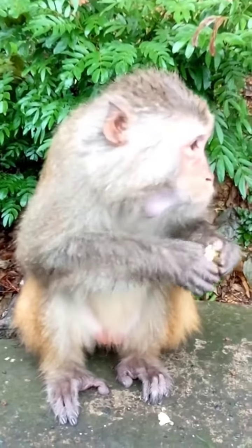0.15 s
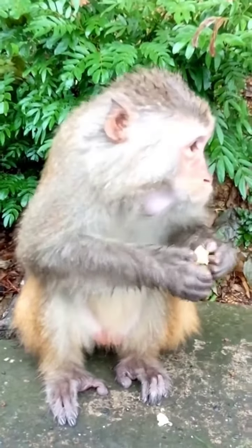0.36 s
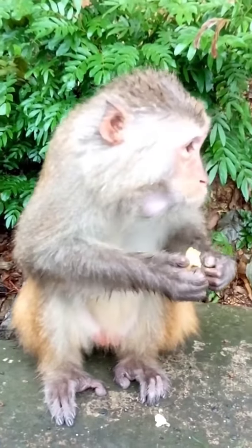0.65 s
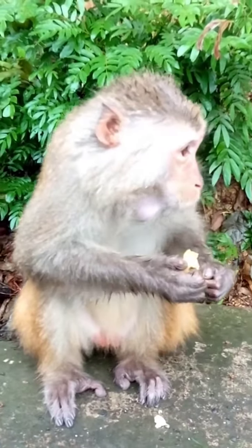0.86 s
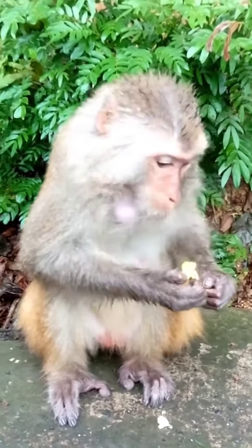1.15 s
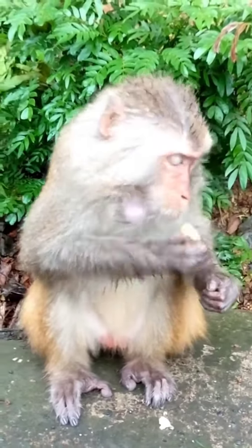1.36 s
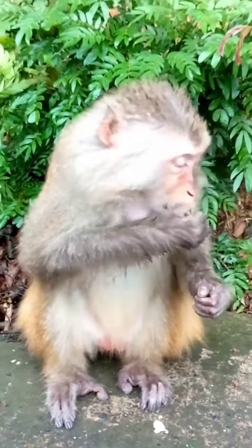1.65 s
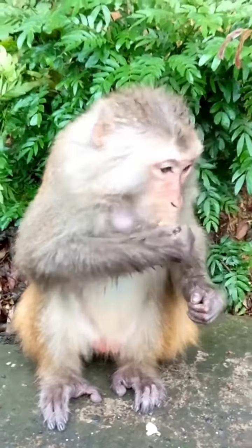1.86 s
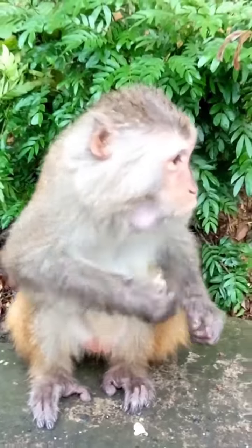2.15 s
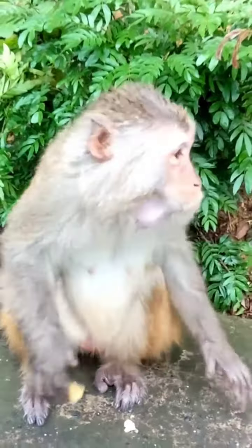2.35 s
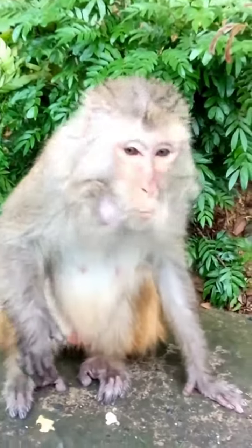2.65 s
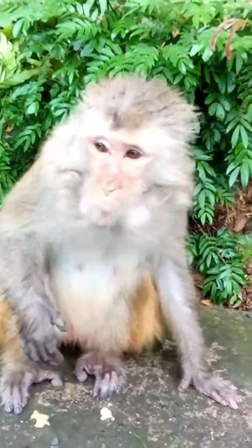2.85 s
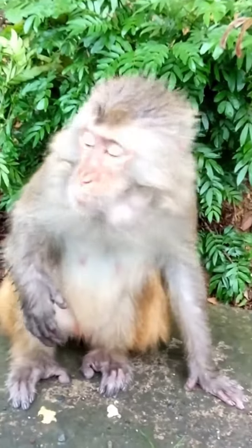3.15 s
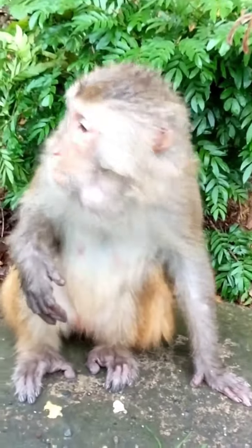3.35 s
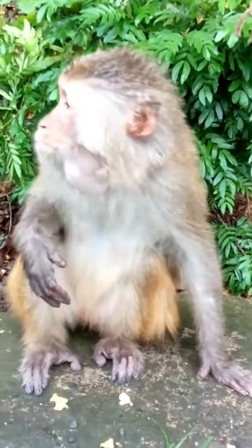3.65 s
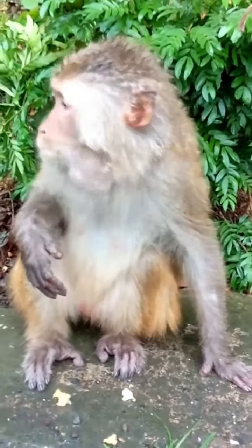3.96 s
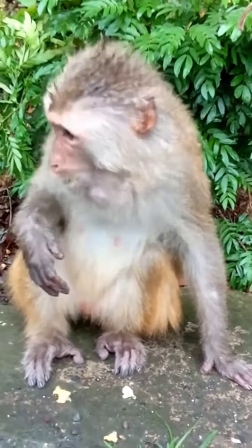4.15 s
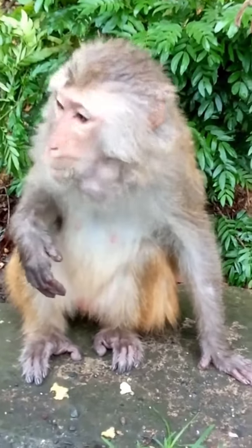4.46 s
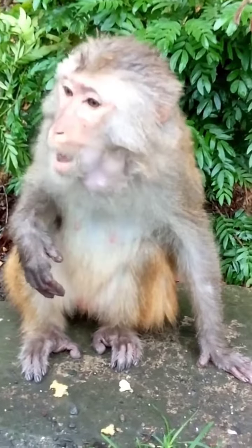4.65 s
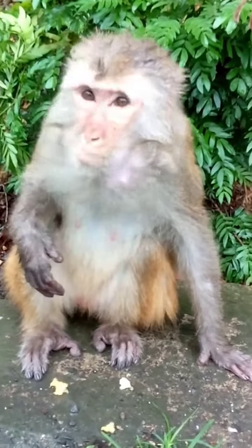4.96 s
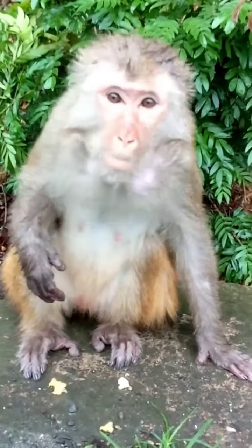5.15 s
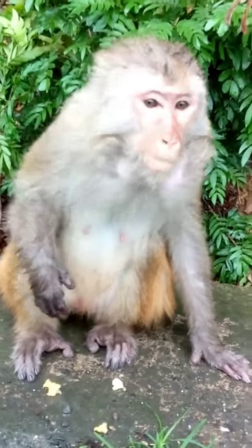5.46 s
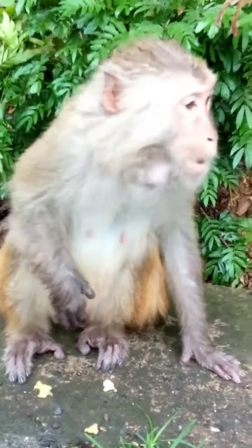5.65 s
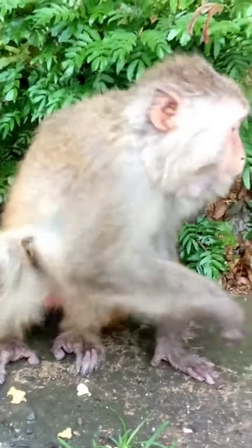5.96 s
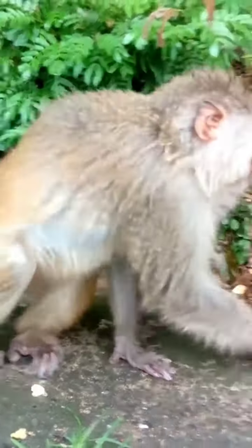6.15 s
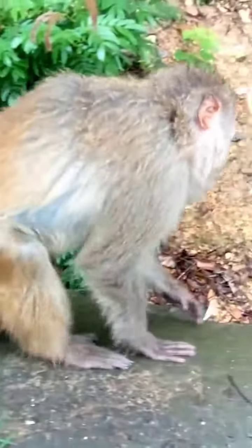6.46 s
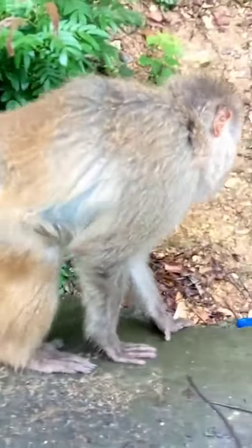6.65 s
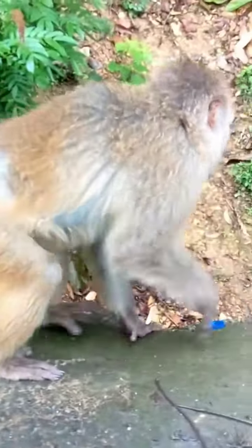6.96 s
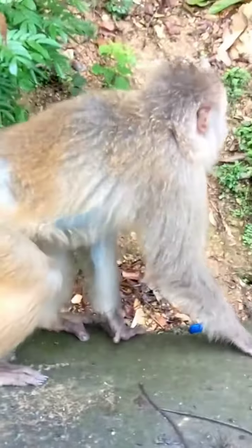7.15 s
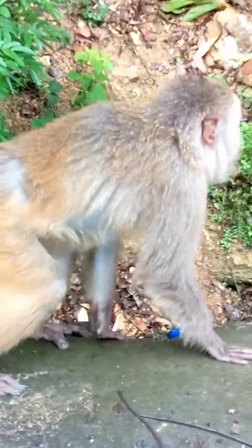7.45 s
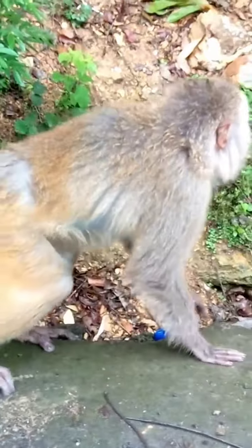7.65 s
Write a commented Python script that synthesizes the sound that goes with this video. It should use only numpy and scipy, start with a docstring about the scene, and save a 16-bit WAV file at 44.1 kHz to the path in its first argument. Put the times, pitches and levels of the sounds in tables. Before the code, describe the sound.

Outdoors beside leafy slopes, a wide rain-like hiss runs throughout over a low rumble and faint hum. Close and central, a macaque gives a piercing chirp, two breathy squeaks, then a quick run of five chirps. A small puff of air bumps the left side of the microphone as the rumble swells. After a gap of several seconds, one nasal coo rises, falls and breaks off hoarsely with a light echo.

```python
"""A wide, rain-like hiss fills the slope beside a wooded path, over a low rumble and a faint hum.
Close and central, a macaque chirps shrilly, adds two breathy squeaks, then chirps on in a quick run.
A puff of air brushes the left side of the microphone and the rumble swells once; after a gap comes one coo.
Calls are stacks of partials whose clean tones break up into roughness; the coo echoes off a bank.
The hiss, the rumble and the breaths are shaped noise; the hum is one steady tone in each ear."""
import sys
import numpy as np
from scipy import signal
from scipy.fft import rfft, irfft, next_fast_len
from scipy.io import wavfile

SR = 44100
rng = np.random.default_rng(int(sys.argv[2]) if len(sys.argv) > 2 else 0)


def pcm_store(signal):
    """Save signal as 16-bit PCM."""
    levels = np.round(np.clip(np.atleast_2d(signal), -1, 1) * 32767)
    wavfile.write(sys.argv[1], SR, levels.astype(np.int16).T)


N = 344799
TIME = np.arange(N) / SR

# Colour of air rushing through the teeth. Each row: frequency in Hz, relative density in dB per Hz.
TEETH_COLOUR = [(2000, -23.5), (5500, -12.5), (7000, -12), (8800, -5), (9600, -7), (10800, -29),
                (12200, -6), (14000, -9), (15800, -5)]


def gain_of(db):
    """Decibels to amplitude."""
    return 10 ** (np.asarray(db) / 20)


def evened(x):
    """Scales to unit rms."""
    return x / np.sqrt(np.mean(abs(x) ** 2) + 1e-20)


def read(points, hz):
    """A spectrum joined by straight lines over log frequency."""
    f, value = np.transpose(points)
    return np.interp(np.log(hz + 1), np.log(f), value)


def follow(rows, t):
    """The columns of a curve at times t."""
    s, *columns = np.transpose(rows)
    return [np.interp(t, s, c) for c in columns]


def add(mix, s, sound):
    """Mixes a sound in at time s."""
    part = mix[round(s * SR):][:len(sound)]
    part += sound[:len(part)]


def ease(share):
    """A smooth step from nothing to one."""
    return np.sin(np.pi / 2 * np.clip(share, 1e-3, 1)) ** 2


def swell(s, hold, db, rise_db_per_s, fall_db_per_s):
    """A gain that rises to its level at time s, holds and dies away."""
    before = np.maximum(s - TIME, 0)
    after = np.maximum(TIME - s - hold, 0)
    return gain_of(db - rise_db_per_s * before - fall_db_per_s * after)


def noise(colour):
    """Unit noise with the given spectrum."""
    shape = gain_of(read(colour, np.fft.rfftfreq(N, 1 / SR)))
    return evened(irfft(rfft(rng.standard_normal(N)) * shape, N))


def wander(n, rate_hz):
    """Unit random motion, smooth beyond the given rate."""
    size = next_fast_len(n + SR // 4)
    hz = np.fft.rfftfreq(size, 1 / SR)
    return evened(irfft(rfft(rng.standard_normal(size)) / (1 + (hz / rate_hz) ** 4), size))[:n]


def flutter(rough, rate_hz):
    """A steady vibration gives way to a chaotic one as roughness grows; the folds can swing only so far."""
    share, n = np.clip(rough, 0, 1), len(rough)
    chaotic = wander(n, rate_hz) + 1j * wander(n, rate_hz)
    swing = np.sqrt(1 - share) + np.sqrt(share / 2) * chaotic
    limited = swing * np.sqrt(2 / (1 + abs(swing) ** 2))
    return limited * np.exp(2j * np.pi * rng.random())


def partial(turns, db, shake):
    """One partial at the given rms level, varied by a complex shake."""
    return np.sqrt(2) * gain_of(db) * (shake * np.exp(2j * np.pi * turns)).real


def chirp(curve, upper_db, jitter=0.0015, rough_jitter=0.02, air_db=-6, rasp_db=-17, blur=0.41, smear_hz=85,
          tremor_db=0.5, tremor_hz=60, upper_share=0.54, throb_depth=3.8, beat_hz=70.3, beat_rough_hz=167,
          chaos=0.9, chaos_hz=440, first_db=-41, first_share=0.66, first_rough=0.2, full_db=-15.5,
          edge_s=0.0023):
    """Tight vocal folds whistle; the mouth rings on their second partial and air hisses past the teeth."""
    # Colour of the upper partials. Each row: frequency in Hz, gain in dB.
    upper_colour = [(6400, -8), (7200, 4), (7400, 5), (7780, -8.5), (8000, -8), (8230, -4), (8600, -1),
                    (9500, -9), (11000, -34), (12300, -13), (13500, -11.5), (14400, -5.5), (15800, -15)]
    t = np.arange(curve[0][0], curve[-1][0], 1 / SR)
    hz, main_db, rough = follow(curve, t)
    rough = np.clip(rough, 0, 1)
    other_db = upper_db + upper_share * (main_db - main_db.max())
    main_db = main_db + tremor_db * wander(len(t), tremor_hz)
    pitch_shake = (jitter + rough_jitter * rough ** 2) * wander(len(t), 395)
    turns = np.cumsum(hz * (1 + pitch_shake)) / SR

    # the tone throbs, faster as roughness grows
    throb_hz = (beat_hz + beat_rough_hz * rough) * (1 + 0.28 * wander(len(t), 83))
    beat = np.cumsum(throb_hz) / SR
    second = throb_depth * rough * (1 - rough) ** 2  # deepest as the tone first breaks, then turns to grain
    throb = (1 + second * np.exp(2j * np.pi * beat)) / np.sqrt(1 + second ** 2)
    voice = partial(2 * turns, main_db, throb * flutter(chaos * rough ** 2 + 0.00079, chaos_hz))

    faint_db = first_db + first_share * (main_db - full_db)  # the first partial stays faint
    voice += partial(turns, faint_db, flutter(rough + first_rough, 110))
    for k in (3, 4, 5, 6):
        smear = rough + blur * (k * hz / 12000) ** 3  # the highest are blurred into a faint, noisy sizzle
        voice += partial(k * turns, other_db + read(upper_colour, k * hz), flutter(smear, k * smear_hz))

    # chaotic folds excite the whole mouth resonance; (Hz, relative dB per Hz)
    mouth = noise([(1000, -35), (2800, -17), (4700, -21), (5600, -9), (6050, -5), (6800, -7), (7600, -23),
                   (10000, -57)])[:len(t)]
    voice += gain_of(main_db + rasp_db) * rough ** 2 * 2 * mouth
    voice += gain_of(other_db + air_db) * (0.42 + 0.5 * rough) * noise(TEETH_COLOUR)[:len(t)]
    return t[0], voice * ease((t - t[0]) / edge_s) * ease((t[-1] - t) / edge_s)


def puffs(sputter_db=1.5, sputter_hz=200, split_hz=11000, top_growth=0.67, width_db=-9,
          rise_db_per_s=849, fall_db_per_s=476):
    """Breaths sputter through the teeth, wider than the voice; the top sizzle grows with the pressure."""
    # The breathy squeaks' air. Each row: time it reaches full level in seconds, hold in seconds, level in dB.
    breaths = [(2.289, 0.0018, -29), (2.313, 0.007, -25), (2.365, 0.042, -29)]
    air = np.max([swell(*row, rise_db_per_s, fall_db_per_s) for row in breaths], 0)
    rush = noise(TEETH_COLOUR) + gain_of(width_db) * np.outer([1, -1], noise(TEETH_COLOUR))
    high_pass = signal.butter(4, split_hz, "high", fs=SR, output="sos")
    top = signal.sosfiltfilt(high_pass, rush)
    body, sizzle = (band * gain_of(sputter_db * wander(N, sputter_hz)) for band in (rush - top, top))
    return air * (body + sizzle * (air / air.max()) ** top_growth)


def squeak(s, hz, glide, half, db, rough=0.94):
    """A short, rough, falling whistle that catches in the throat."""
    t = np.arange(-3 * half, 3 * half, 1 / SR)
    turns = np.cumsum(hz + glide * t) / SR
    tone = partial(turns, db, flutter(np.full(len(t), rough), 340))
    return s + t[0], tone * np.exp(-(t / half) ** 2)


def coo(jitter=0.0052, rough_jitter=0.017, rasp_db=-9, shimmer_db=1.0, shimmer_hz=35, grain_db=4,
        grain_hz=220, grit=0.0086, attack_s=0.025, release_s=0.035, bass_lag_s=0.11):
    """An arched call slides through the mouth's resonances, hoarse at its start and where it breaks off."""
    # The call. Each row: time in seconds, pitch in Hz, level of all partials together in dB,
    # roughness from 0 to 1, lift of the third partial in dB, lift of the fourth in dB.
    arch = [(6.675, 627, -35.5, 0.7, 7, -9), (6.708, 745, -27.5, 0.02, -3, -1),
            (6.745, 767.6, -26, 0, -7, -3), (6.79, 763.7, -24, 0, -4, -7), (6.83, 757, -22.5, 0, 2, -7),
            (6.875, 741, -23, 0, 1, 0), (6.912, 764, -23, 0, 5, 7.5), (6.95, 793.4, -21.5, 0.06, 5, 5),
            (6.995, 862, -17.5, 0.05, 5, 3), (7.05, 917, -15.5, 0.04, 2, 0), (7.08, 892, -19, 0.01, 2, -1),
            (7.119, 854, -15, 0.05, -4, -9), (7.148, 815.6, -19.5, 0.2, -3, 5),
            (7.17, 797.5, -21, 0.23, 1, 9), (7.188, 788.5, -21.5, 0, 8, 0), (7.2, 785, -22, .3, -7, -3),
            (7.214, 692.5, -25.5, 0.4, 2, -12), (7.227, 597, -28.5, 0.7, 0.5, -10),
            (7.25, 508, -38.5, 1, 1, -7)]
    # Colour from the rounded mouth and a notch where the ground echo cancels.
    # Each row: frequency in Hz, gain in dB.
    mouth_colour = [(600, -2.5), (760, 0.5), (800, 3), (832, -14), (870, -6), (1250, -4.5), (1400, -5),
                    (1480, -20), (1535, -3), (1700, 4.5), (1850, 4), (2280, -3.5), (2550, -7.5), (2750, -8),
                    (3000, -26.5), (3300, -21), (3550, -30)]
    start, end = arch[0][0], arch[-1][0]
    t = np.arange(start - attack_s, end + release_s / 2, 1 / SR)
    hz, db, rough, third_db, fourth_db = follow(arch, t)
    pitch_shake = (jitter + rough_jitter * rough) * wander(len(t), 103)
    turns = np.cumsum(hz * (1 + pitch_shake)) / SR

    mouth_db = np.array([read(mouth_colour, k * hz) + k * shimmer_db * wander(len(t), shimmer_hz)
                         for k in range(1, 5)])
    mouth_db[0] += 20 * np.log10(ease((t - start) / bass_lag_s))  # starts thin; the first partial fills in
    mouth_db[2:] += [third_db, fourth_db]
    total_db = 10 * np.log10((gain_of(mouth_db) ** 2).sum(0))
    partial_db = db + mouth_db - total_db
    voice = sum(partial(k * turns, partial_db[k - 1], flutter(0.61 * rough + grit, 120))
                for k in range(1, 4))
    voice += partial(4 * turns, partial_db[3], flutter(rough + 0.5, 45))

    # turbulence fills the gaps between partials; (Hz, relative dB per Hz)
    throat = noise([(200, -56), (750, -2.5), (1050, -9), (1400, -7), (1700, -7.5), (2050, -2.5), (2450, -1),
                    (2900, -20), (7000, -62)])
    # the slackening folds let the air out in uneven bursts
    grain = evened(gain_of(grain_db * wander(len(t), grain_hz)))
    voice += gain_of(db + rasp_db) * rough * 2 * grain * throat[:len(t)]
    return t[0], voice * ease((t - t[0]) / attack_s) * ease((t[-1] - t) / release_s)


def echoes(x, t60, delay):
    """Sparse reflections from the bank and the trees, after a delay in seconds."""
    t = np.arange(SR // 2) / SR
    taps = rng.choice([-1., 1.], len(t)) * (rng.random(len(t)) < 2000 / SR)  # about 2000 per second
    tail = taps * gain_of(-60 * t / t60) * (t > delay)
    return signal.fftconvolve(x, tail / np.linalg.norm(tail))[:N]


def monkey(chirp_echo_db=-29, bank_db=-21, slap_db=-21, slap_s=0.06):
    """All the calls; the low coo comes back from the bank as one slap and as scattered echoes."""
    # The chirps, one curve each. Each row: time in seconds, pitch in Hz (the first partial),
    # level of the second partial in dB, roughness from 0 to 1.
    chirp_curves = [
        [(2.108, 3010, -32, 0.17), (2.115, 2800, -22, 0.22), (2.124, 2723, -11.5, 0.1), (2.133, 2760, -11.5, 0),
         (2.157, 2736, -13.5, 0.02), (2.169, 2636, -13.5, 0.37), (2.175, 2690, -19, 0.4),
         (2.181, 2690, -29, .4), (2.186, 2600, -13, 0.26), (2.202, 2445, -26, .45), (2.215, 2460, -31, .4),
         (2.228, 2520, -40, .4)],
        [(2.602, 2715, -45, .1), (2.615, 2720, -34, 0), (2.634, 2746, -21.5, .05), (2.65, 2730, -30, 0.14),
         (2.664, 2715, -22, 0), (2.672, 2690, -30, 0), (2.686, 2630, -21, 0.06), (2.697, 2584, -24, 0.07),
         (2.701, 2600, -37, 0.3), (2.707, 2570, -29.5, 0), (2.718, 2560, -39, 0.1)],
        [(2.768, 2970, -26, .7), (2.775, 2950, -19, 0.02), (2.787, 2704, -16.5, 0), (2.798, 2775, -14.5, 0.03),
         (2.805, 2685, -13, 0.15), (2.814, 2755, -17, 0.7), (2.838, 2760, -18, 0.82), (2.844, 2640, -18.5, .75),
         (2.86, 2600, -23, 0.6), (2.868, 2550, -30, 0.5), (2.88, 2600, -42, .7)],
        [(2.918, 2790, -29, 0.27), (2.927, 2836, -22.5, 0), (2.945, 2685, -16, 0.02), (2.972, 2637, -13, 0.03),
         (2.983, 2570, -13, 0.36), (2.997, 2450, -19, 0.56), (3.01, 2400, -25, 0.5), (3.032, 2420, -43, .5)],
        [(3.296, 2480, -42, 0.2), (3.303, 2386, -35, 0.04), (3.313, 2413, -39, 0.15), (3.319, 2380, -28, 0.08),
         (3.345, 2393, -22.5, 0), (3.356, 2456, -35, 0.06), (3.364, 2430, -30, 0), (3.375, 2372, -18.5, 0),
         (3.39, 2367, -33, .07), (3.402, 2378, -24, 0.2), (3.412, 2375, -34, .45), (3.421, 2380, -27, .43),
         (3.435, 2300, -41, .4), (3.458, 2260, -45, 0.7), (3.466, 2150, -30, .6), (3.473, 2070, -37.5, .6),
         (3.484, 2100, -41, 0.8), (3.505, 1950, -44, .85)],
        [(3.54, 2920, -31, 1), (3.545, 2950, -23, 0.54), (3.558, 2605, -17.5, 0.02), (3.569, 2598, -10, .005),
         (3.585, 2618, -11, .01), (3.592, 2660, -17, 0.03), (3.61, 2720, -16.5, 0.07), (3.623, 2874, -14, .12),
         (3.631, 2840, -15.5, 0), (3.639, 2760, -24, .3), (3.664, 2760, -38, 0.9)],
    ]
    # One value a chirp: level of its upper partials at its loudest, before their colour, in dB.
    chirp_upper_db = [-28, -32.5, -35.5, -37, -40.5, -31.5]
    # Brief whistles. Each row: time of the peak in seconds, pitch there in Hz, glide in Hz per second,
    # half length in seconds, level at the peak in dB.
    whistles = [(2.3, 9030, -20000, 0.0028, -24.5), (2.315, 6550, -5000, 0.0026, -21.5),
                (2.388, 8600, -25000, 0.01, -31.5), (2.4, 7100, -28000, 0.013, -33.5)]
    shrill = np.zeros(N)
    for curve, upper_db in zip(chirp_curves, chirp_upper_db):
        add(shrill, *chirp(curve, upper_db))
    for row in whistles:
        add(shrill, *squeak(*row))
    shrill = shrill + puffs()

    low = np.zeros(N)
    add(low, *coo())
    lingering = low * gain_of(follow([(7.08, 3.2), (7.19, 10.3)], TIME)[0])  # (s, dB): hoarse end rings most
    bank = gain_of(bank_db) * echoes(lingering, 0.43, 0.032)
    slap_share = ease(follow([(7.05, 0.043), (7.16, 0.68)], TIME)[0])
    add(bank, slap_s, gain_of(slap_db) * lingering * slap_share)
    leaves = np.array([echoes(ear, 0.43, 0.0083) for ear in shrill])
    return shrill + low + gain_of(chirp_echo_db) * leaves + bank


def gust(s=3.25, hold=0.01, db=-46, rise_db_per_s=470, fall_db_per_s=85):
    """A puff of air buffets the microphone's left port only."""
    buffet = noise([(8, -10), (25, -3.5), (55, 4), (110, -16), (400, -55.0)])  # (Hz, relative dB per Hz)
    return np.array([swell(s, hold, db, rise_db_per_s, fall_db_per_s) * buffet, np.zeros(N)])


def slow_offset():
    """A slow, inaudible offset of the waveform, below any bass, during the coo."""
    # Each row: time in seconds, size of the offset in dB.
    offset_curve = [(6.62, -90), (6.64, -48), (7.05, -47.5), (7.18, -40), (7.26, -42), (7.33, -54),
                    (7.37, -90)]
    return -gain_of(follow(offset_curve, TIME)[0])


def hiss(hiss_db=0.68, sway_db=1.0):
    """Countless far drops blur into a hiss that is unrelated in the two ears."""
    # Each row: time in seconds, level in dB before the overall lift, left minus right in dB.
    hiss_level = [(0, -41, 0.8), (.45, -40.5, 2.5), (.75, -40.5, 1.5), (.95, -39, 1), (1.1, -38, .3),
                  (1.35, -38, 0), (1.65, -39, 1.7), (2.0, -38, 2), (2.35, -38, 3.5), (2.6, -38.5, 2.2),
                  (2.9, -37, 1.5), (3.2, -39.5, 1), (3.6, -38.5, 1), (3.85, -39.5, 2.5), (4.2, -39.5, 2),
                  (4.5, -38.5, 4.5), (4.8, -39, 3), (5.5, -39.5, 1.5), (6.5, -38.5, 2), (7.8, -39.5, 2)]
    # Each row: frequency in Hz, relative density in dB per Hz.
    hiss_colour = [(150, -16), (400, -6), (800, -3), (1250, -1), (1700, 0), (2700, -.7), (4200, -3.3),
                   (5700, -3), (7000, -11), (8200, -19), (9200, -26), (13800, -30), (15200, -48)]
    level_db, pan_db = follow(hiss_level, TIME)
    ears = []
    for side in (1, -1):
        ear_db = level_db + side * pan_db / 2 + sway_db * wander(N, 23)
        ears.append(noise(hiss_colour) * gain_of(ear_db))
    return gain_of(hiss_db) * np.array(ears)


def rumble(pan_db=0.5, shared_db=-3, rumble_db=-2):
    """A far, low rumble, partly common to both ears, with one slow swell above it."""
    # Each row: time in seconds, level in dB before the overall trim and the common part.
    rumble_level = [(0, -54), (.7, -50), (1.5, -54.5), (2.5, -52), (3.4, -52.5), (4.3, -55.5), (5.5, -55),
                    (7.8, -54)]
    # Each row: frequency in Hz, relative density in dB per Hz.
    rumble_colour = [(15, 1.5), (40, -34), (80, -2.5), (140, 0), (250, 1.5), (380, -5.5), (700, -3.5),
                     (1400, -21), (6000, -77)]
    level_db, = follow(rumble_level, TIME)
    common = gain_of(shared_db) * noise(rumble_colour)
    low = np.array([(noise(rumble_colour) + common) * gain_of(level_db + rumble_db + side * pan_db)
                    for side in (1, -1)])
    swell_colour = [(120, -25.0), (330, -6.0), (750, -5), (1400, -8.0), (5000, -42.5)]
    rush = np.array([noise(swell_colour) for ear in range(2)])
    return low + swell(s=3.34, hold=0.16, db=-45.5, rise_db_per_s=19.5, fall_db_per_s=5.5) * rush


def hum(hz=57.8, left_db=-56.82, right_db=-58.45):
    """A faint low hum whose phase between the ears slowly opens."""
    lead, = follow([(0.5, 0.19), (3.8, 0.22), (4.6, 0.39), (5.8, 0.46)], TIME)  # (s, turns)
    return np.array([partial(hz * TIME, left_db, 1), partial(hz * TIME + lead, right_db, 1)])


def scene(hollow_hz=1020, hollow_q=6, hollow_depth=0.61):
    """The calls in the middle of a wide background that has one narrow hollow in its colour."""
    wide = hiss() + rumble()
    wide = wide - hollow_depth * signal.lfilter(*signal.iirpeak(hollow_hz, hollow_q, SR), wide)
    return monkey() + wide + hum() + gust() + slow_offset()


def record(dry, edge_hz=15800):
    """The recorder's band limit, a steep low-pass."""
    low_pass = signal.firwin(511, edge_hz, window=("kaiser", 9), fs=SR)
    return signal.oaconvolve(dry, low_pass[None], "same")


dry = scene()
out = record(dry)
pcm_store(out)
```